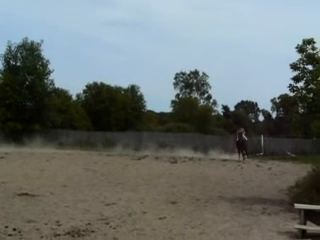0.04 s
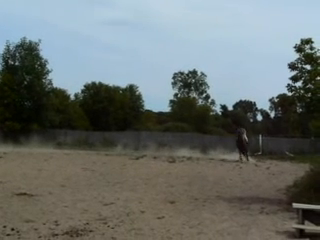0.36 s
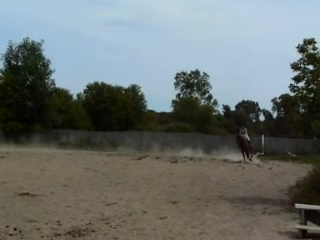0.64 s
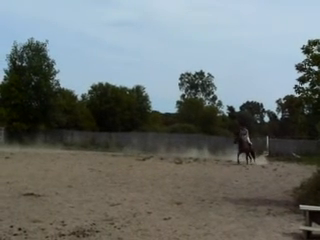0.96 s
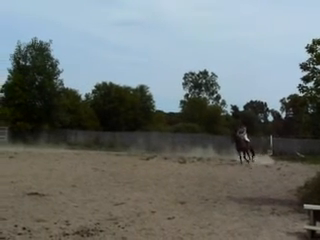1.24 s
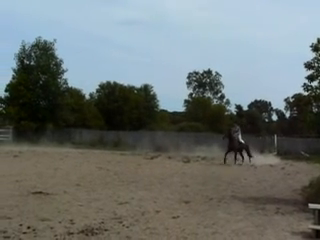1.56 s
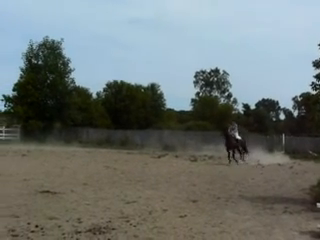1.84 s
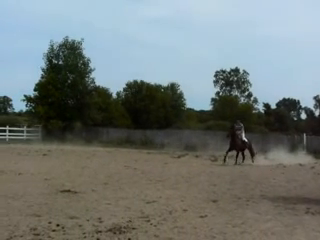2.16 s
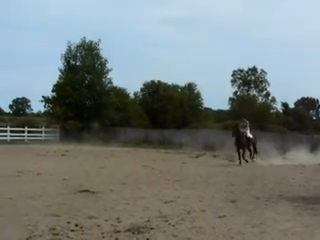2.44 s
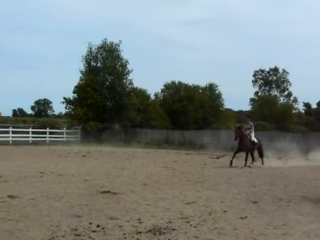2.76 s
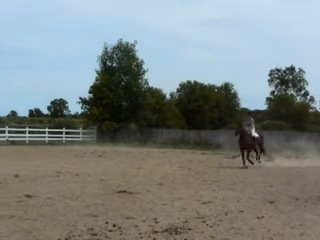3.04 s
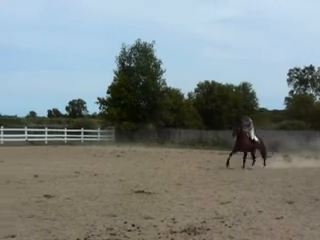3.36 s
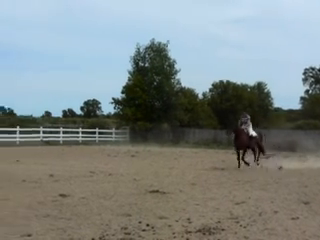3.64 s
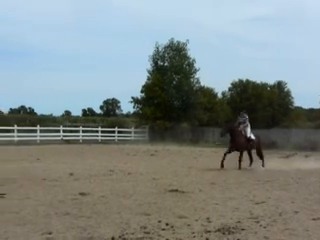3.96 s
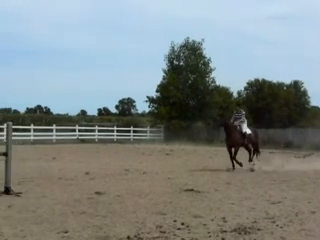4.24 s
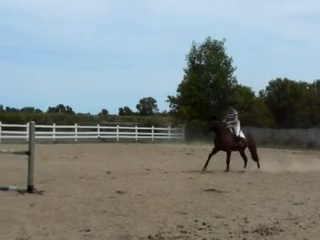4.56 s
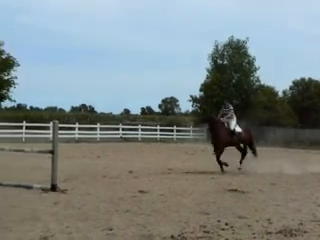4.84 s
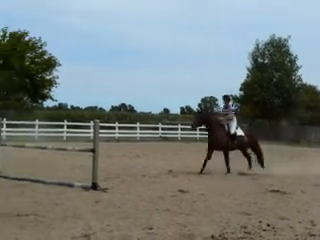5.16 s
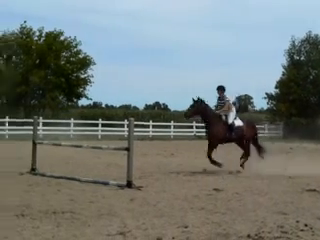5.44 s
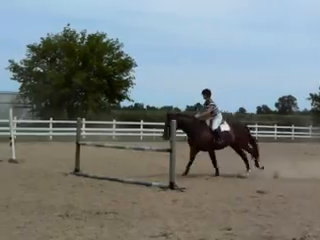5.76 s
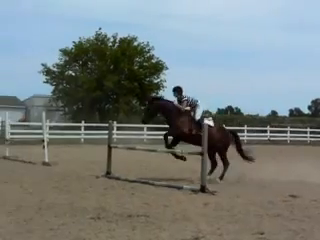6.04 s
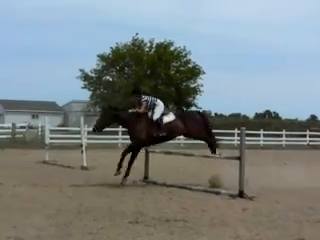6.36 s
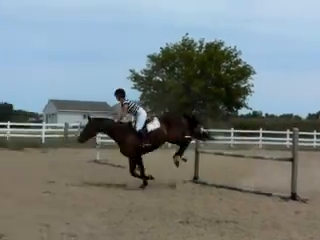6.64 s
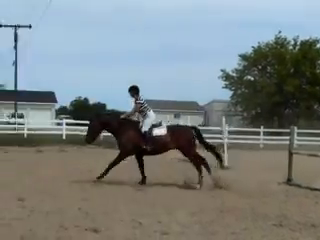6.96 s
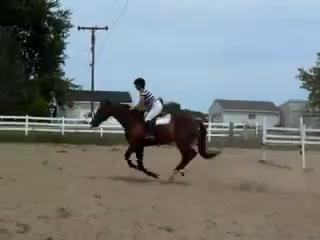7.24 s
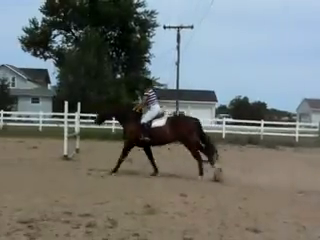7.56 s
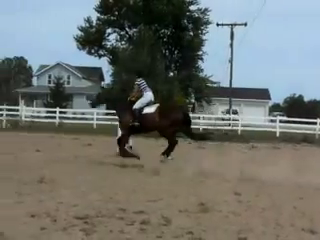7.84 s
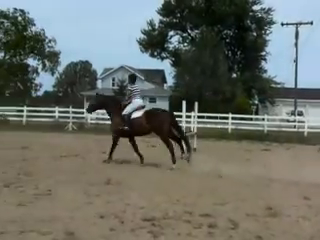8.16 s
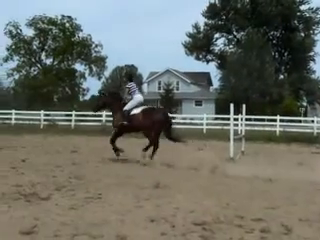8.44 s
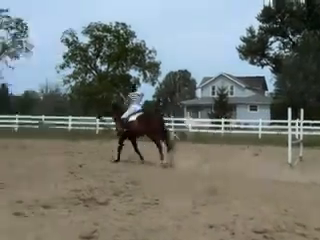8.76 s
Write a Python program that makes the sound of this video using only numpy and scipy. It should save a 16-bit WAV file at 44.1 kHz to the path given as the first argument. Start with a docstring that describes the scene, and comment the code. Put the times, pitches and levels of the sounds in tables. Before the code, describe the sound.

A steady outdoor hush opens with a few sharp little ticks of grit or tack. A horse then canters closer across a sand arena, each hoof thudding, clopping and crunching, with sand pattering down after it. The hind hoofs grind on grit at take-off, the horse lands heavily from a low jump with a sharp click, and canters on. The small camera microphone sounds grainy and dull.

```python
"""A steady outdoor hush opens, with sharp little ticks of grit or tack. From about 1 s a horse canters
across a sand arena toward a small camera: each hoof thuds into the footing, clops and crunches the sand,
which sprays and patters down again. Near 5.9 s the hind hoofs grind on grit as it takes off over a low
rail. It lands heavily from 6.5 s, forefeet then hind feet, and canters on. Throughout, the camera's
coarse sampling makes the sound grainy and dulls its treble."""
import sys
import numpy as np
from scipy import signal
from scipy.fft import rfft, irfft, next_fast_len
from scipy.io import wavfile
from scipy.ndimage import map_coordinates

SR = 44100
rng = np.random.default_rng(int(sys.argv[2]) if len(sys.argv) > 2 else 0)


def transcribe(u):
    """Save the signal u as a 16-bit wav file named by the first command-line argument.

    u: samples, shape (n,) or (channels, n), limited to [-1, 1]; the rate is SR.
    q: integer samples, one column per channel.
    """
    v = np.clip(np.atleast_2d(u).T, -1, 1)
    q = np.round(v * 32767).astype(np.int16)
    wavfile.write(sys.argv[1], SR, q)


N = 392049
LEAD = SR // 25  # samples of a strike before its moment of full weight
T = np.arange(-LEAD, 3 * LEAD) / SR  # seconds around that moment

# hoof strikes: time_s, thud_db, thud_hz, clop_db, clop_hz, crunch_db, crunch_hz, slide_s
HOOF_STRIKES = [(1.189, -41, 187, -43.5, 890, -42.5, 2350, 0.0028),
                (1.633, -41, 300, -44.5, 734, -48, 1810, 0.0028),
                (1.6631, -39.5, 180.5, -57, 600, -50, 1800, 0.0045),
                (1.78, -35.5, 190, -42.5, 780, -47, 2730, 0.0028),
                (2.2277, -40, 254, -49.5, 553, -48.5, 1690, 0.0043),
                (2.3804, -35.5, 303, -44.5, 886, -43.5, 1770, 0.0048),
                (2.8123, -38, 196, -45.5, 600, -46.5, 1850, 0.0059),
                (2.9545, -36, 214, -46.5, 706, -47.5, 1810, 0.0047),
                (3.4156, -31, 284, -46.5, 700, -38, 1740, 0.0084),
                (3.5577, -29, 207, -43.5, 590, -50, 1800, 0.0012),
                (4.006, -28.5, 163, -43.5, 820, -40.5, 1800, 0.0051),
                (4.1461, -25, 198, -37.5, 725, -42.5, 1760, 0.0032),
                (4.5773, -46.5, 197, -47.5, 910, -38.5, 1880, 0.0073),
                (4.598, -32, 181, -44.5, 660, -44, 1975, 0.0081),
                (4.7186, -26, 145, -32.5, 602, -42, 2000, 0.0044),
                (5.12, -32, 258, -42, 746, -47.5, 1290, 0.0026),
                (5.146, -30.5, 178, -38.5, 940, -33.5, 2060, 0.0076),
                (5.2680, -20.5, 205, -44, 600, -33.5, 2200, 0.0016),
                (5.675, -40.5, 190, -39.5, 940, -38, 1750, .0012),
                (5.6809, -30.5, 170, -34, 910, -33.5, 1830, 0.0033),
                (5.7176, -21.5, 225, -45, 734, -37.5, 1700, 0.0057),
                (5.824, -14.5, 198, -27.5, 930, -31, 2160, 0.0022),
                (6.058, -29.5, 163.5, -37.5, 567, -39, 1720, 0.005),
                (6.102, -33, 235, -41.5, 683, -39.5, 2000, .004),
                (6.237, -32, 219, -45.5, 680, -48, 1750, 0.0053),
                (6.2652, -35.5, 344, -48, 555, -45.5, 1980, 0.0049),
                (6.4894, -32, 224, -34.5, 750, -37, 1870, 0.0019),
                (6.493, -14, 180, -31, 680, -21.5, 1950, 0.0022),
                (6.5555, -25.5, 267, -36.5, 750, -35, 2050, .003),
                (6.812, -30, 156, -37.5, 623, -40, 1740, 0.004),
                (6.8248, -23.5, 151.4, -45, 675, -40.5, 2520, 0.0048),
                (6.8915, -20, 205, -30, 600, -27, 1850, .004),
                (6.9377, -13, 200, -24, 820, -27.5, 1550, 0.0013),
                (7.0831, -19.5, 290, -32, 640, -28.5, 1680, 0.0036),
                (7.3528, -52, 249, -42, 900, -38, 2400, .0008),
                (7.367, -39, 190, -43.5, 850, -39.5, 2300, 0.0075),
                (7.4843, -24, 240, -39.5, 890, -35.5, 1910, 0.0015),
                (7.494, -30, 180, -36.5, 900, -31.5, 1855, .006),
                (7.5074, -24.5, 201, -31.5, 564, -41.5, 1880, 0.0022),
                (7.6445, -13, 156, -32, 967, -23, 2120, .0013),
                (8.0705, -34, 287, -30, 600, -36, 1790, 0.0013),
                (8.0775, -29, 240, -28.5, 760, -35, 1790, 0.0027),
                (8.0876, -29.5, 191, -33, 780, -36.5, 1865, 0.0028),
                (8.2176, -18, 145.7, -34.5, 576, -30.5, 1790, 0.0042),
                (8.521, -47.5, 167, -41, 770, -41.5, 1750, 0.013),
                (8.65, -22.5, 227, -35, 915, -35, 1810, 0.0069),
                (8.667, -37.5, 211, -40.5, 733, -39, 1830, 0.0033),
                (8.7894, -21, 148, -45, 900, -33, 2110, 0.0051)]
# hard clicks of grit or tack: start_s, level_db, pitch_hz, rattle_t60_s
GRIT_TICKS = [(0.064, -47.5, 2720, 0.027), (0.3577, -46.5, 2500, 0.035), (0.5278, -48.5, 1910, 0.038),
              (1.278, -40, 1760, 0.04), (1.5063, -38, 2820, 0.028), (3.272, -46, 2330, 0.076),
              (5.241, -48.5, 3130, 0.034), (5.909, -33, 1190, 0.04), (6.786, -47, 2740, 0.021),
              (6.882, -19.5, 2970, 0.022), (6.885, -25, 3400, .025), (6.9389, -30, 4160, 0.0087),
              (6.97, -43, 2160, 0.039), (7.0212, -49, 1510, 0.028), (7.205, -37.5, 2620, 0.012),
              (7.266, -53, 2830, 0.027), (7.351, -28, 2950, 0.016), (8.2782, -45, 1960, 0.048)]
# sand scuffed and thrown by the feet: centre_s, level_db, spread_s, pitch_hz
SAND_SCUFFS = [(.587, -41, 0.01, 1800), (0.661, -48, 0.0074, 1780), (.735, -47, 0.0083, 1930),
               (4.81, -42, 0.01, 1640), (5.01, -42.5, 0.016, 1960), (5.568, -40, 0.018, 1720),
               (5.925, -34, 0.015, 2650), (6.175, -37.5, 0.021, 1980), (6.665, -39.5, 0.018, 2240),
               (7.59, -44, 0.064, 2260), (7.719, -44, 0.075, 2200), (7.953, -37.5, 0.016, 1820)]
# resonances of the take-off scrape: pitch_hz, width_hz, level_db
PUSH_OFF_MODES = [(1184, 120, 2.5), (2140, 150, -3), (2900, 220, 0.5), (3530, 140, -7), (4560, 220, -4)]
# decay of the arena's tail: frequency_hz, t60_s
ARENA_DECAY = [(100, 0.42), (250, 0.36), (600, 0.39), (2000, 0.28), (5000, 0.042)]

# tone curves of the sources: frequency_hz, gain_db
HUSH_EQ = [(25, -17.5), (45, -23), (85, -11.5), (130, -12.5), (200, -13), (350, -14.5), (500, -15.5),
           (750, -14), (1200, -19), (2000, -22), (3000, -24), (5000, -24.5)]  # outdoor air
GROUND_EQ = [(30, -41.5), (70, -17), (130, -6.5), (200, -4), (320, -8.5), (480, -12), (900, -29)]  # falling clods and ground rumble
SPRAY_EQ = [(200, -7.5), (500, -15), (800, 13), (1300, 4.5), (2000, 5), (3000, -4), (4000, -3.5),
            (5200, -3)]  # sand pattering down
SCRAPE_EQ = [(200, -12), (500, -10), (800, 7.5), (1300, 1), (2000, 4), (3000, -1.5), (4000, -2.5),
             (5200, 3)]  # sand dragged under a hoof
GRIT_EQ = [(200, -12.5), (500, -11.5), (800, 2.5), (1300, 2.5), (2000, 3), (3000, 1), (4000, 2),
           (5200, 6.5)]  # small hard contacts
LUMPS_EQ = [(35, -34.5), (70, 0.5), (130, 1.5), (200, 2), (330, 5), (420, -5), (520, -13.5), (700, -9.5),
            (1100, -24)]  # packed footing breaking
CLOP_EQ = [(250, -18.5), (350, 8.5), (500, -3), (660, 2.5), (900, 1.5), (1250, -10.5), (1700, -31.5),
           (3000, -46.5)]  # the hollow of the sole
CRUNCH_EQ = [(500, -16), (1050, 3), (1500, 3), (2400, 1), (3000, -1.5), (3800, -14.5), (5200, -3)]  # sand being crushed
THUD_EQ = [(25, -27), (55, -6), (100, 1.5), (200, 2), (290, 2.2), (390, 5.5), (520, -2), (800, -8),
           (1500, -23), (3000, -18)]  # the footing giving way

# the camera's treble roll-off: frequency_hz, gain_db
CAMERA_EQ = [(3000, 1), (3600, -2.5), (4100, -8), (4500, -15.5), (4800, -22.5), (5050, -29.5),
             (5350, -36.5)]
# very faint high hiss, strongest near 11 kHz: frequency_hz, gain_db
HIGH_HISS_EQ = [(5000, 0.5), (9800, -1.5), (11000, 11), (12000, -4)]
# faint steady high tones that flutter with loud strikes: pitch_hz, level_db
HIGH_TONES = [(5512.5, -98), (6890.6, -106), (8268.8, -104), (9646.9, -108), (11025, -90)]


def amp(db):
    """Decibels to gain."""
    return 10 ** (np.asarray(db) / 20)


def unit(x):
    """Scale to rms 1."""
    return x / np.sqrt(np.mean(x ** 2) + 1e-20)


def burst(x):
    """Scale a short sound to the energy of 10 ms at rms 1."""
    return x / np.sqrt(np.sum(x ** 2) / (.01 * SR) + 1e-20)


def along(points, hz):
    """Read (frequency_hz, value) points on a log axis."""
    knots_hz, values = np.transpose(points)
    return np.interp(np.log(hz + 1), np.log(knots_hz + 1), values)


def filtered(x, response):
    """Filter x by a gain given as a function of frequency."""
    size = next_fast_len(len(x) + 4096)
    return irfft(rfft(x, size) * response(np.fft.rfftfreq(size, 1 / SR)), size)[:len(x)]


def coloured(x, eq):
    """Shape x with a tone curve."""
    return filtered(x, lambda hz: amp(along(eq, hz)))


def coloured_impact(x, eq):
    """Shape an impact with a minimum-phase tone curve, which keeps its attack crisp."""
    size = 2 * next_fast_len(len(x))
    cepstrum = irfft(np.log(amp(along(eq, np.fft.rfftfreq(size, 1 / SR)))), size)
    cepstrum[1:size // 2] *= 2
    cepstrum[size // 2 + 1:] = 0
    return irfft(rfft(x, size) * np.exp(rfft(cepstrum)), size)[:len(x)]


def resonate(x, hz, width_hz, direct):
    """Ring x in one resonance and mix in a direct share of it."""
    return filtered(x, lambda f: direct + 1j * f * width_hz / (hz * hz - f * f + 1j * f * width_hz))


def grains(size, rate):
    """Tiny impacts of random strength, about rate a second."""
    return (rng.random(size) < rate / SR) * rng.standard_normal(size)


def wobble(rate):
    """A wandering random curve, rate knots a second."""
    knots = rng.standard_normal(int(N * rate / SR) + 4)
    return map_coordinates(knots, [np.arange(N) * rate / SR], order=1)


def add(track, time_s, sound):
    """Lay a sound into the track, starting LEAD samples ahead of time_s."""
    start = max(round(time_s * SR) - LEAD, 0)
    part = track[start:start + len(sound)]
    part += sound[:len(part)]


def digitise(x, every, step, bias_steps):
    """Divide the sample rate by every and round to coarse steps, which makes the quiet hush grainy."""
    slow = signal.resample_poly(x, 1, every)
    steps = np.round(slow / step + bias_steps) - bias_steps
    return signal.resample_poly(steps * step, every, 1)[:N]


def high_hiss():
    """A very faint high hiss, strongest near 11 kHz."""
    return amp(-94) * unit(coloured(rng.standard_normal(N), HIGH_HISS_EQ))


def high_tones(sound, offset):
    """Faint steady high tones that flutter with loud strikes."""
    t = np.arange(N) / SR
    tones = sum(amp(db) * np.sqrt(2) * np.sin(2 * np.pi * hz * t) for hz, db in HIGH_TONES)
    return (1 + .49 * sound / offset) * tones


def hush():
    """The bed: steady outdoor air and microphone hiss, lows and highs each wavering slightly."""
    air = coloured(rng.standard_normal(N), HUSH_EQ)
    low = filtered(air, lambda hz: 1 / (1 + (hz / 390) ** 8))
    low_db = -54 + 1.3 * wobble(rate=16)
    high_db = -47.5 + 1.1 * wobble(rate=30)
    return amp(low_db) * unit(low) + amp(high_db) * unit(air - low)


def crackle():
    """A faint, sparse crackle runs through the hush."""
    specks = coloured(grains(N, rate=45), SPRAY_EQ)
    return amp(-60) * unit(resonate(specks, hz=1860, width_hz=700, direct=.9))


def arena_tail(x):
    """Fences, trees and ground scatter a short tail, 10 ms behind the sound."""
    hz, t, noise = signal.stft(rng.standard_normal(SR // 2), SR, nperseg=256)
    decay = amp(-60 * t / along(ARENA_DECAY, hz)[:, None])
    _, tail = signal.istft(noise * decay, SR, nperseg=256)
    delayed = np.pad(x, (SR // 100, 0))
    return signal.fftconvolve(delayed, tail / np.linalg.norm(tail))[:N]


def settling_sand(fade_s=.14):
    """Every strike throws clods and sand that patter down; heavier blows throw only a little more."""
    t = np.arange(N) / SR
    power = np.zeros(N)
    for time_s, thud_db, *_ in HOOF_STRIKES:
        start = round(time_s * SR)
        power[start:] += amp(.53 * thud_db - 37.5) ** 2 * np.exp(-t[:N - start] / fade_s)
    clods = unit(coloured(grains(N, rate=900), GROUND_EQ))
    sand = unit(coloured(grains(N, rate=300), SPRAY_EQ))
    return np.sqrt(power) * (clods + amp(-2.5) * sand)


def ticks(ring_only_db=-44.5, crack_range_db=27):
    """Grit or tack clicks and rattles: light ticks ring at their own pitch, hard ones add more crack."""
    track = np.zeros(N)
    first_contact = amp(-5.5) * burst(1. * (T == 0))
    for start_s, level_db, pitch_hz, t60_s in GRIT_TICKS:
        decay = (T >= 0) * amp(-60 * np.maximum(T, 0) / t60_s)
        rattle = burst(decay * grains(len(T), rate=4600))
        contacts = coloured_impact(first_contact + rattle, GRIT_EQ)
        crack = np.clip((level_db - ring_only_db) / crack_range_db, .03, .6)
        tick = resonate(contacts, pitch_hz, width_hz=470, direct=crack)
        add(track, start_s, amp(level_db) * burst(tick))
    return track


def scuffs():
    """Dragging feet throw sand: each scuff swells and rasps at its own pitch over a ground rumble."""
    track = np.zeros(N)
    t = np.arange(-SR // 4, SR // 4) / SR
    for centre_s, level_db, spread_s, pitch_hz in SAND_SCUFFS:
        scrape = coloured(grains(len(t), rate=1000), SCRAPE_EQ)
        rasp = unit(resonate(scrape, pitch_hz, width_hz=530, direct=.87))
        rumble = amp(-8.5) * unit(coloured(grains(len(t), rate=900), GROUND_EQ))
        swell = amp(level_db) * np.exp(-.5 * (t / spread_s) ** 2)
        add(track, centre_s + t[0] + LEAD / SR, swell * (rasp + rumble))
    return track


def push_off(centre_s=5.923, spread_s=.011):
    """The hind hoofs grind on grit at take-off: dense slips ring in a few narrow resonances."""
    track = np.zeros(N)
    slips = grains(len(T), rate=1800) * np.exp(-.5 * (T / spread_s) ** 2)
    ring = sum(amp(db) * resonate(slips, hz, width_hz, direct=0) for hz, width_hz, db in PUSH_OFF_MODES)
    add(track, centre_s, amp(-32.5) * burst(ring))
    return track


def thud(level_db, pitch_hz, body_hz=170, crest_cycles=.52, fade_cycles=1.25, rise_s=.00039):
    """The footing gives under the hoof and swings for two or three cycles over the deeper ground."""
    after, before = np.maximum(T, 0), np.minimum(T, 0)

    def swing(hz):
        fade = ((after * hz - crest_cycles) / fade_cycles) ** 2
        return np.cos(2 * np.pi * hz * T) * np.exp(-fade - (before / rise_s) ** 2)

    body = amp(2.5 + .24 * level_db)  # far strikes carry less deep ground and sound thinner
    blow = (swing(pitch_hz) + body * swing(body_hz)) / (1 + body)
    return amp(level_db) * coloured(blow, THUD_EQ)


def crush(delay_s, spread_s, rate, steep):
    """Sand grains break away in a short swell that rises steep times faster than it dies."""
    progress = np.clip((T - delay_s) / spread_s, -30, 30)
    return burst(grains(len(T), rate) / (np.exp(-steep * progress) + np.exp(progress)))


def hoofs():
    """Each strike layers a thud, breaking lumps, the hollow clop of the sole and a crunch of sand."""
    track = np.zeros(N)
    for time_s, thud_db, thud_hz, clop_db, clop_hz, crunch_db, crunch_hz, slide_s in HOOF_STRIKES:
        weight = thud(thud_db, thud_hz)
        # packed footing breaks unevenly; this stands out more in faint, distant strikes
        breaking = crush(.0009, .003 + .31 * slide_s, rate=3000, steep=1.3)
        lumps = amp(.55 * thud_db - 19.5) * burst(coloured(breaking, LUMPS_EQ))
        # a flat, quick landing slaps the ground; a sliding one grinds before it takes the weight
        flatness = min(.0024 / slide_s, 1.4)
        slap = flatness * amp(5.5 + .36 * thud_db) * burst(1. * (T == 0))
        grind_delay_s = .00049 - .7 * slide_s
        sole_grind = crush(grind_delay_s, slide_s, rate=3300, steep=2.2)
        sole = coloured_impact(slap + sole_grind, CLOP_EQ)
        clop = amp(clop_db) * burst(resonate(sole, clop_hz, width_hz=600, direct=.12))
        # under a heavy hoof the sand is squeezed again as the footing swings back
        rebound = amp(2 + .6 * thud_db) * crush(.85 / thud_hz, .0013, rate=5000, steep=1.7)
        sand_grind = crush(grind_delay_s, 1.4 * slide_s, rate=1600, steep=2.4)
        sand = coloured_impact(slap + rebound + sand_grind, CRUNCH_EQ)
        rasp = resonate(sand, crunch_hz, width_hz=490, direct=.67)
        knock = amp(-5.5) * resonate(sand, crunch_hz, width_hz=130, direct=0)
        crunch = amp(crunch_db) * burst(rasp + knock)
        add(track, time_s, weight + lumps + clop + crunch)
    return track


def scene():
    """The horse over the outdoor bed, in an open arena where little sound comes back."""
    horse = hoofs() + settling_sand() + ticks() + scuffs() + push_off()
    echo = amp(-26) * arena_tail(horse)
    return (horse + echo + hush() + crackle())[None]


def record(dry):
    """The camera rounds peaks, samples coarsely and dulls the treble. Faint tones and hiss lie above."""
    ceiling, offset, top_hz = .44, -.04, 12500
    rounded = dry[0] / (1 + (dry[0] / ceiling) ** 6) ** (1 / 6)
    grainy = digitise(rounded, every=4, step=.007, bias_steps=-.15)
    dulled = filtered(grainy, lambda hz: amp(along(CAMERA_EQ, hz)) / (1 + (hz / 5750) ** 80))
    mix = dulled + high_tones(dulled, offset) + high_hiss()
    return filtered(mix, lambda hz: hz < top_hz)[None] + offset


dry = scene()
out = record(dry)
transcribe(out)
```